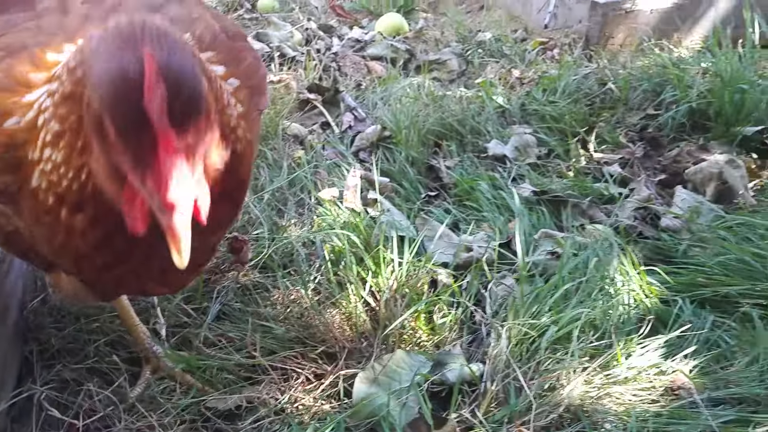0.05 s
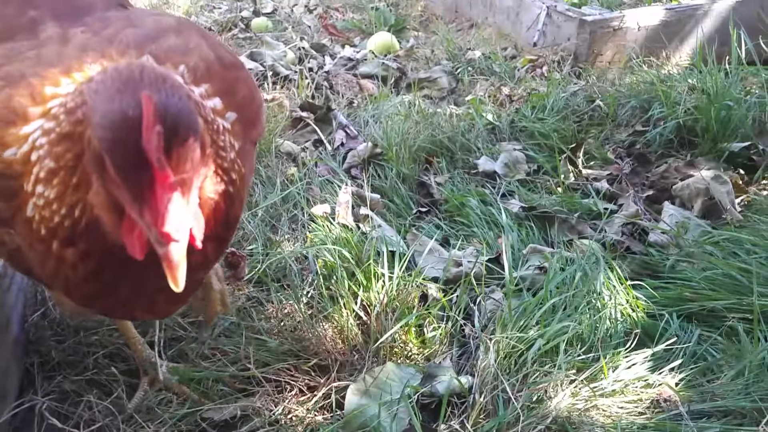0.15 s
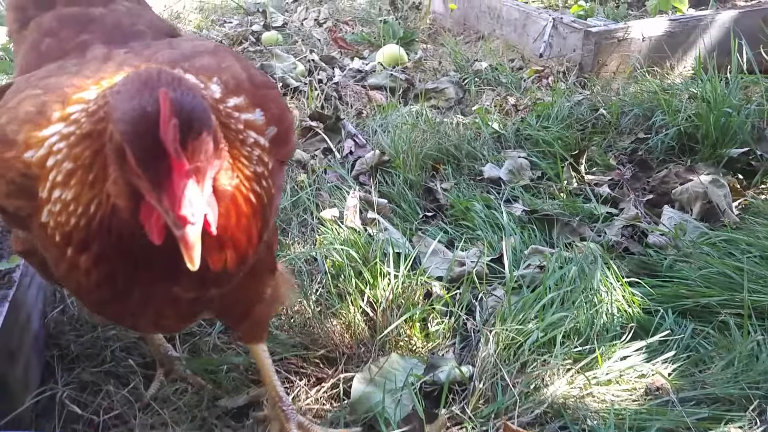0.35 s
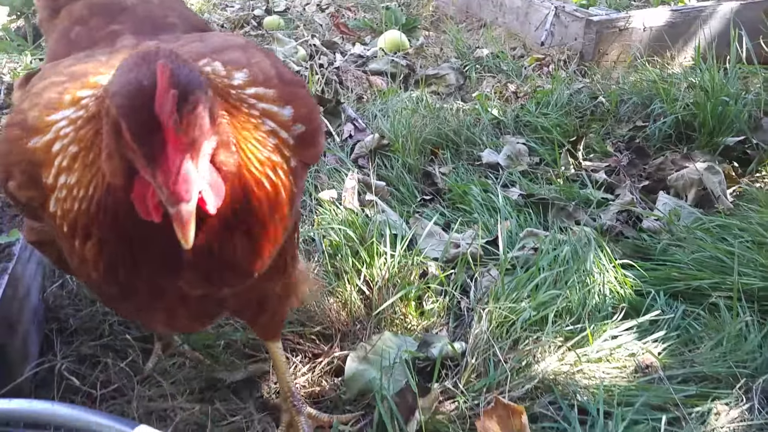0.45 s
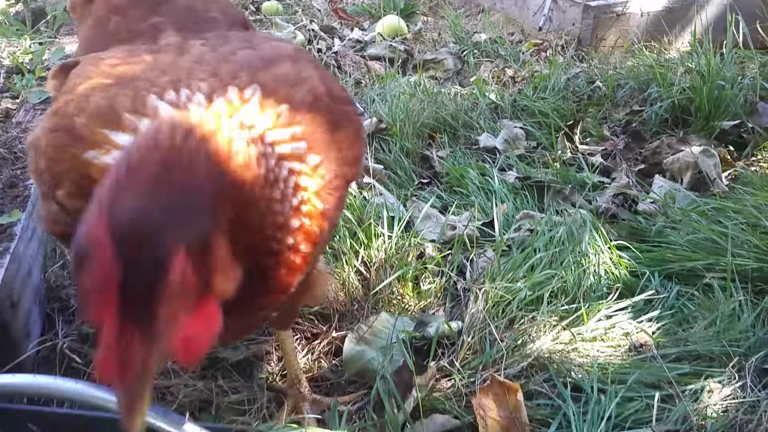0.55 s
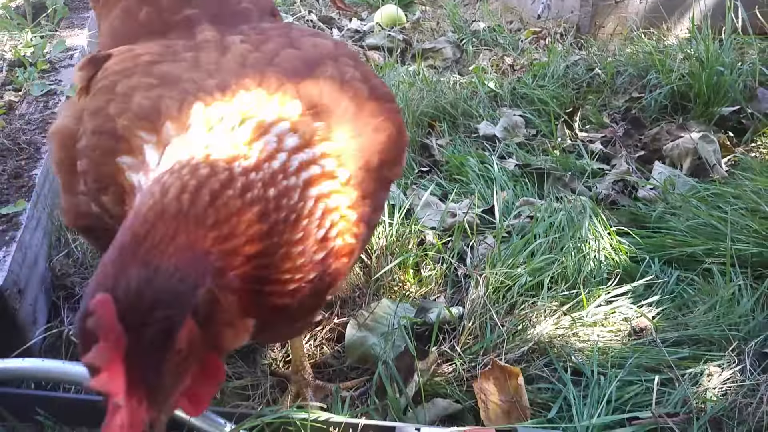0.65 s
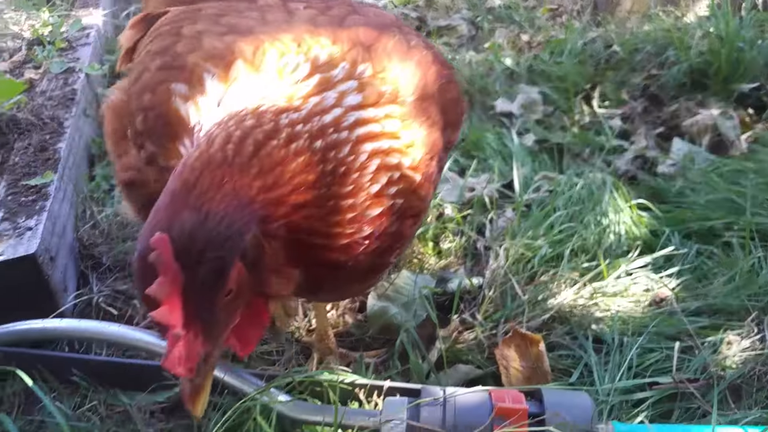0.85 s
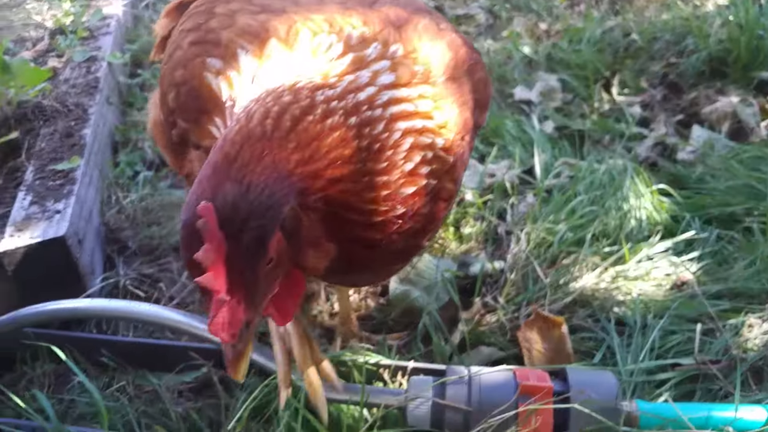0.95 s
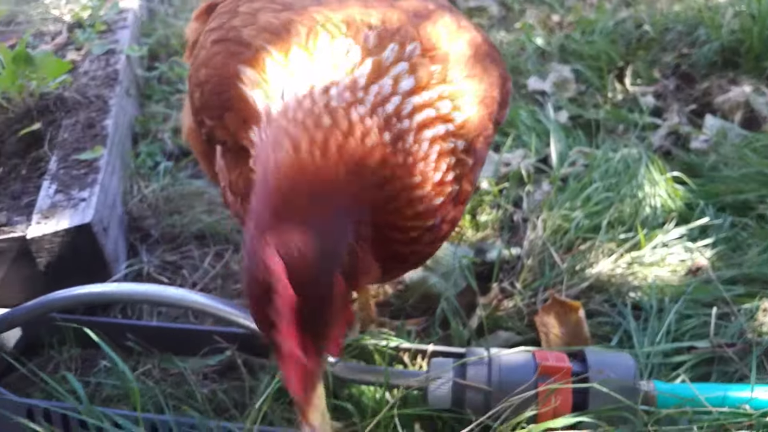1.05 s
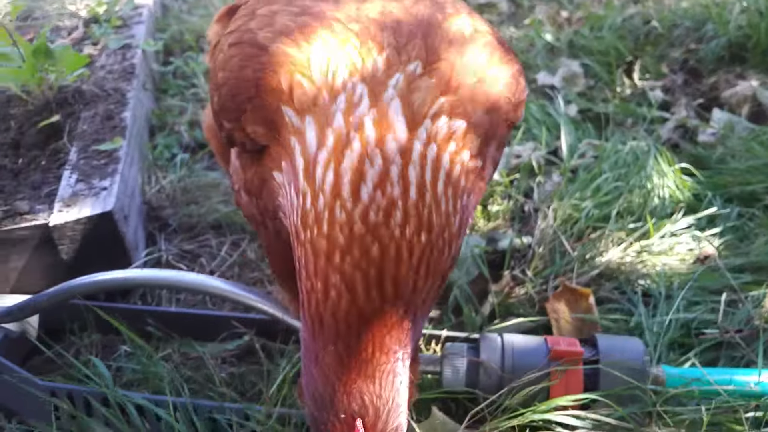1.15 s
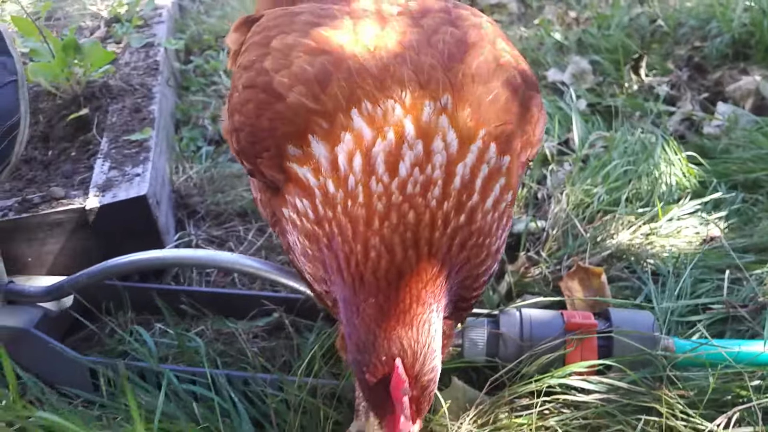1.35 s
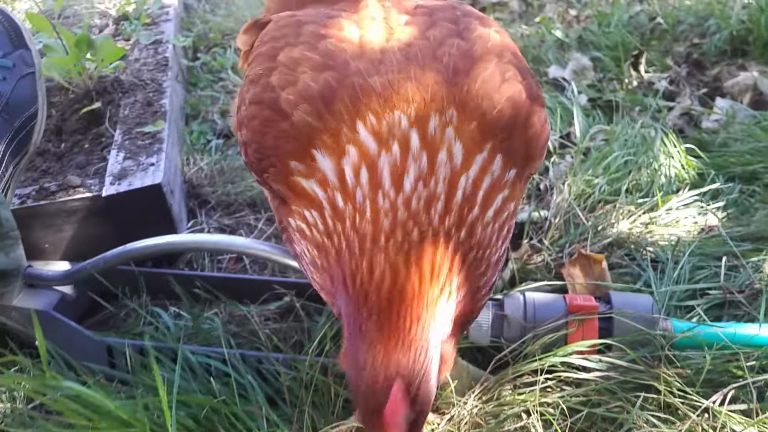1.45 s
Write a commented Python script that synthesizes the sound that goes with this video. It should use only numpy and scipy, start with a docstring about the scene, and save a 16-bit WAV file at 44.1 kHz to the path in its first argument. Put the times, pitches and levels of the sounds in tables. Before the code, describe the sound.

A hen gives three short, soft clucks close to the microphone as she walks through a garden. A twig snaps and dry leaves crackle among the clucks, then feathers brush the grass over a low outdoor rumble and faint hiss.

```python
"""A hen on a lawn

A hen walks up and gives three soft, falling clucks, harmonic tones shaped by her throat's resonances.
Dry leaves and a twig snap and crackle under her feet and beak; her feathers brush the grass as she bends.
Behind her is a low outdoor rumble. The right microphone port rings in the treble; the left is muffled."""
import sys
import numpy as np
from scipy import signal
from scipy.fft import rfft, irfft, next_fast_len
from scipy.io import wavfile
from scipy.ndimage import map_coordinates

SR = 44100
rng = np.random.default_rng(int(sys.argv[2]) if len(sys.argv) > 2 else 0)


def pcm_store(signal):
    """Save signal as 16-bit PCM."""
    levels = np.round(np.clip(np.atleast_2d(signal), -1, 1) * 32767)
    wavfile.write(sys.argv[1], SR, levels.astype(np.int16).T)


N = 66150
T = np.arange(N) / SR

# Responses of the two microphone ports. Each row: frequency in Hz, gain in dB.
LEFT_PORT_GAIN = [(50, -14.5), (500, -28), (900, -18), (1400, -17.5), (2500, -11), (3200, -8), (4100, -8.5),
                  (5500, -12), (7600, -11.5), (9500, -15), (13000, -11.5)]
RIGHT_PORT_GAIN = [(50, 3), (3000, 1), (4800, 3.5), (5500, 9), (6000, 13), (6500, 12.5), (7200, 7),
                   (8500, -0.5), (10000, -3.5), (15000, -8)]
# Spectra of outdoor air, scuffed soil, leaf litter, sliding feathers and a tearing leaf.
# Each row: frequency in Hz, gain in dB.
AIR_SPECTRUM = [(25, -33), (38, -26.5), (50, -7.5), (64, 3), (80, -0.5), (100, -6), (128, -5), (170, -10.5),
                (250, -16.5), (400, -22.5), (850, -21.5), (1300, -24.5), (2500, -28), (5000, -32),
                (9000, -35), (16000, -51)]
SOIL_SPECTRUM = [(60, -3), (240, -0.5), (400, -5.5), (700, -5), (1300, -9.5), (2500, -23.5), (6000, -37)]
LITTER_SPECTRUM = [(200, -23), (1200, -8), (2400, -5.5), (3800, -3.5), (6000, 1.5), (8000, 4),
                   (11000, -2.5), (16000, 0)]
FEATHER_SPECTRUM = [(200, 2.5), (1000, -1.5), (2500, 2), (4000, 0.5), (6300, 1), (9000, 5.5), (16000, -2.5)]
LEAF_SPECTRUM = [(200, -17), (700, -21.5), (1500, -15), (2500, -8), (3600, -4), (6500, 1.5), (9000, 4.5),
                 (12000, 1.5), (16000, -11)]
# Far tones. Each row: frequency in Hz, peak time in seconds, level in dB,
# seconds to fade by 6 dB (of either sign).
FAR_TONES = [(774.6, 0.789, -68.5, 0.555), (457.4, 0.03, -71.5, 1.23), (127, .7, -69, -5)]
# Steps on soft ground. Each row: peak time in seconds, level in dB, seconds to fall to 1/e.
FOOTFALLS = [(0.026, -61.5, 0.0328), (0.146, -61.5, 0.0514)]
# Pressure on the litter. Each row: peak time in seconds, level in dB, seconds to rise 20 dB,
# seconds to fall 20 dB.
LITTER_SWELLS = [(0.269, -57.5, 0.35, 0.392), (0.407, -45.5, 0.01, 0.01), (0.521, -48.5, 0.077, 0.151),
                 (0.565, -39.5, 0.061, 0.1438), (.81, -57, 0.0584, 0.163), (0.921, -62.5, 0.042, 0.0534)]
# Leaves and stalks breaking. Each row: start in seconds, level in dB, tear length in seconds,
# body in dB, resonance in Hz.
FRACTURES = [(0.456, -22.5, 0.00229, 11.5, 6238), (0.4992, -24, 0.00292, -5.5, 6433),
             (0.5045, -28.5, 0.00385, 2, 3850), (0.5412, -24, 0.00201, -1.5, 7156),
             (0.5646, -42.5, 0.00041, 7.5, 6300), (0.587, -38.5, 0.00061, -7.5, 7140),
             (0.609, -34, 0.00081, -4.5, 6120), (0.6263, -36, 0.00092, -1, 6260),
             (0.6566, -38.5, 0.00147, 6.5, 5530), (0.663, -39, 0.00138, 3.5, 5920),
             (0.6725, -40, 0.0021, -12.5, 6070), (0.69, -35, 0.00054, 0, 6280),
             (0.702, -30, 0.00027, 2.5, 5770), (0.72, -45, .0006, -2.5, 6970),
             (0.7272, -40, 0.00058, -0.5, 6780), (0.796, -48, 0.0028, -2.5, 7360),
             (0.823, -42, 0.00328, -2, 4925), (0.856, -46, 0.0009, 0.5, 5600),
             (0.9032, -32.5, 0.000906, 0.5, 5570), (0.9152, -43.5, 0.00045, 10.5, 5840),
             (0.9246, -47, 0.00082, 4.5, 5350), (1.105, -54.5, 0.00092, -1.5, 6100),
             (1.1282, -53.5, 0.00085, 8, 7020)]
# Colour that a thick stalk adds. Each row: frequency in Hz, multiplier of a fracture's body in dB.
BODY_WEIGHTS = [(200, 1.3774), (1500, 2.0264), (3000, 1.7838), (4500, -0.5), (6500, 1), (11000, 0.8746)]
# Modes of the twig. Each row: frequency in Hz, level in dB, seconds to decay by 60 dB.
TWIG_MODES = [(296, -52.5, 0.037), (902, -46.5, 0.071), (1544, -37, 0.0183), (2186, -51, 0.0116),
              (2820, -32, .013), (4113, -34, 0.0317), (4920, -31.5, 0.032)]
# Throat pulses ahead of a cluck. Each row: start in seconds, level of the first pulse in dB.
CREAK_ONSETS = [(0.3717, -12.5), (0.5502, -20)]
# Filters for the voice's pulses, harmonics and breath noise. Each row: frequency in Hz, gain in dB.
CREAK_SPECTRUM = [(80, -15), (230, 4.5), (450, -1), (700, 6.5), (1000, -1), (1300, 1.5), (1700, -49.5),
                  (4000, -45)]
THROAT_FORMANTS = [(450, -2), (600, 2.5), (900, 9.5), (1100, 8.5), (1200, -16), (1400, -3), (1600, -15.5),
                   (1850, -10), (2020, -13), (2200, -29.5), (3200, -30.5)]
RASP_SPECTRUM = [(1000, -19.5), (3000, -7.5), (4400, 2), (5600, -13.5), (9000, -18.5), (16000, -39.5)]
# The clucks. Each row: start, length and attack in seconds, first and resting pitch in Hz, glide time
# in seconds, source level in dB, offset of harmonic 2 in dB, offset of harmonics 3-5 and rasp in dB.
CLUCK_NOTES = [(.227, 0.05687, 0.0268, 590, 448.7, 0.01477, -38.5, -2, -1),
               (0.384, 0.05262, 0.0229, 570, 471.3, 0.01608, -38.5, -6, -7.5),
               (0.562, 0.0324, 0.0232, 545, 438.6, 0.02667, -37.5, -10, -5)]

FRACTURE_RISE_S = 0.000626


def amp(db):
    """Amplitude ratio of a level in decibels."""
    return 10 ** (np.asarray(db) / 20)


def unit_rms(x):
    """Normalisation to unit mean power."""
    return x / np.sqrt(np.mean(x ** 2) + 1e-20)


def ramp(u):
    """A raised-cosine step from 0 to 1."""
    return np.sin(np.pi / 2 * np.clip(u, 0, 1)) ** 2


def curve_at(points, hz):
    """Interpolation of (Hz, value) points on a logarithmic frequency axis."""
    freqs, values = np.transpose(points)
    return np.interp(np.log(hz + 1), np.log(freqs + 1), values)


def wobble(knots_per_s):
    """Smooth random modulation: a spline through Gaussian values."""
    return map_coordinates(rng.standard_normal(int(N * knots_per_s / SR) + 4), [T * knots_per_s])


def colour(x, points, scale=1, size=1024):
    """Minimum-phase filtering by (Hz, dB) points, their decibels multiplied by scale."""
    gain = amp(scale * curve_at(points, np.fft.rfftfreq(size, 1 / SR)))
    cepstrum = irfft(np.log(gain))
    cepstrum[1:size // 2] *= 2  # folding the cepstrum makes the filter causal
    cepstrum[size // 2 + 1:] = 0
    response = irfft(np.exp(rfft(cepstrum)))
    return signal.fftconvolve(np.atleast_2d(x), response[None], axes=1)[:, :x.shape[-1]]


def ports(x):
    """Each port filters the sound: the left attenuates it, the right resonates near 6 kHz."""
    x = np.atleast_2d(x)
    return np.vstack([colour(x[0], LEFT_PORT_GAIN), colour(x[-1], RIGHT_PORT_GAIN)])


def unit_at_ports(x):
    """Port filtering, normalised to unit power on the right."""
    y = ports(x)
    return y / np.std(y[1])


def noise_pair(angle=1, size=N):
    """Partial coherence: two white noises whose correlation is cos(angle)."""
    shared, independent = rng.standard_normal((2, size))
    return np.array([np.cos(angle) * shared + np.sin(angle) * independent, shared])


def grains(per_s, spread_db=6.5):
    """Shot noise: tiny fractures at random moments, with log-normal sizes."""
    sizes = amp(spread_db * np.clip(rng.standard_normal(N), -2, 2))
    occurs = rng.random(N) < per_s / SR
    return unit_rms(occurs * sizes * noise_pair())


def garden(waver_hz=2.154):
    """Ambient noise, strongest in the bass, with faint far tones wavering in frequency."""
    air = unit_at_ports(colour(noise_pair(angle=1.81), AIR_SPECTRUM, size=8192))
    tones = np.zeros(N)
    for hz, peak, db, fade in FAR_TONES:
        phase = 2 * np.pi * np.cumsum(hz + waver_hz * wobble(25.28)) / SR
        tones += amp(db) * 2 ** -(((T - peak) / fade) ** 2) * np.sin(phase)
    return amp(-56.5) * air + ports(tones)


def steps():
    """Soft contact: feet on soil give short, dull swells of noise."""
    weight = sum(amp(db) * np.exp(-((T - peak) / width) ** 2) for peak, db, width in FOOTFALLS)
    return weight * unit_at_ports(colour(noise_pair(), SOIL_SPECTRUM))


def rustle():
    """Crackling noise follows the pressure on the litter; stray grass blades tick throughout."""
    pressure = sum(amp(db - 20 * np.maximum((peak - T) / rise, (T - peak) / fall))
                   for peak, db, rise, fall in LITTER_SWELLS)
    crackle = unit_at_ports(colour(grains(per_s=2000) + amp(1) * noise_pair(), LITTER_SPECTRUM))
    ticks = unit_at_ports(colour(grains(per_s=160), LITTER_SPECTRUM))
    return pressure * crackle + amp(-72) * ticks


def feather_brush(peak_s=1.2792, width_s=0.0721):
    """Sliding friction of feathers on grass gives one soft swell of grainy noise."""
    swell = 1 / (1 + ((T - peak_s) / width_s) ** 4) ** 0.78
    friction = noise_pair() + amp(-1.5) * grains(per_s=1800)
    return amp(-51.5) * swell * unit_at_ports(colour(friction, FEATHER_SPECTRUM))


def snaps(size=2048, tear_t60_s=0.0046, ring_db=9.5, ring_edge_ratio=1.0722):
    """Brittle fracture: a brief tear and a shiver excite the leaf's resonance; thick stalks add body."""
    out, t = np.zeros((2, N + size)), T[:size]
    for start, db, length, body_db, ring_hz in FRACTURES:
        after = np.maximum(t - length, 0)
        shiver_t60_s = 8.26 * length
        shiver = amp(7 - 60 * after / shiver_t60_s)
        envelope = ramp(t / FRACTURE_RISE_S) * (amp(-60 * after / tear_t60_s) + shiver)
        tear = colour(envelope * noise_pair(size=size), LEAF_SPECTRUM)
        resonance = [(ring_hz / ring_edge_ratio, 0), (ring_hz, ring_db), (ring_hz * ring_edge_ratio, 0)]
        crack = ports(colour(colour(tear, BODY_WEIGHTS, scale=body_db), resonance))
        crack *= np.linalg.norm(envelope / envelope.max()) / np.linalg.norm(crack[1])
        first = round(start * SR)
        out[:, first:first + size] += amp(db) * crack
    return out[:, :N]


def twig(rattle_cycles=0.141):
    """The first fracture excites a twig's damped modes; rubbing of the split wood scatters their phase."""
    t = np.maximum(T - FRACTURES[0][0], 0)
    ring = np.zeros(N)
    for hz, db, t60 in TWIG_MODES:
        cycles = hz * t + rng.random() + rattle_cycles * wobble(700)
        ring += amp(db - 60 * t / t60) * np.sin(2 * np.pi * cycles)
    return ports(ramp(t / FRACTURE_RISE_S) * ring)


def creaks(first_gap_s=0.0042, gap_ratio=0.82, fade_db=3):
    """Pulse excitation: the throat opens with four quickening, weakening impulses."""
    pulses = np.zeros(N)
    for time, db in CREAK_ONSETS:
        for k in range(4):
            pulses[round(time * SR)] += amp(db - fade_db * k)
            time += first_gap_s * gap_ratio ** k
    return colour(pulses, CREAK_SPECTRUM)[0]


def clucks(release_s=0.01276, jitter=0.0076, overtone_growth=0.66):
    """Source and filter: falling harmonics pass the throat's formants; overtones grow with effort."""
    out = np.zeros(N)
    for start, length, attack, first_hz, rest_hz, glide, db, second_db, upper_db in CLUCK_NOTES:
        t = np.maximum(T - start, 0)
        hz = rest_hz + (first_hz - rest_hz) * np.exp(-(t / glide) ** 1.65)
        phase = 2 * np.pi * np.cumsum(hz * (1 + jitter * wobble(305.84))) / SR
        effort = np.sqrt(ramp(t / attack)) * ramp((length - t) / release_s)
        for k, offset_db in enumerate([0, second_db, upper_db, upper_db, upper_db], 1):
            level_db = db + curve_at(THROAT_FORMANTS, k * hz) + offset_db
            out += amp(level_db) * effort ** (1 + overtone_growth * (k - 1)) * np.sin(k * phase)
        rasp = unit_rms(colour(rng.standard_normal(N), RASP_SPECTRUM)[0])
        out += amp(upper_db - 68) * effort ** 2 * (1 + np.cos(phase)) * rasp  # one puff a cycle
    return out


def hen(echo_t60_s=0.207, echo_cutoff_hz=1800):
    """Direct sound and reverberation: her voice and its faint, dull return from the garden."""
    voice = clucks() + creaks()
    t = T[:SR // 4]
    lowpass = signal.butter(2, echo_cutoff_hz, fs=SR)
    tail = signal.lfilter(*lowpass, rng.standard_normal((2, len(t)))) * amp(-60 * t / echo_t60_s)
    tail *= np.sqrt(2 * echo_cutoff_hz / SR) / np.linalg.norm(tail[1])  # about unit passband gain
    echo = signal.fftconvolve(voice[None], tail, axes=1)[:, :N]
    return ports(voice + amp(-24) * echo)


def scene():
    """Superposition of the hen, the leaves and the garden at the two ports."""
    return hen() + steps() + snaps() + twig() + rustle() + feather_brush() + garden()


def record(dry, whine_hz=13500, band_limit_hz=16000):
    """Self-noise and band limiting: the electronics add hiss and a thin whine, then cut the top treble."""
    hiss = amp(-65.5) * rng.standard_normal((2, N))
    whine = amp(-76.5) * np.sin(2 * np.pi * whine_hz * T)
    size = next_fast_len(N + SR // 2)
    passband = np.fft.rfftfreq(size, 1 / SR) < band_limit_hz
    return irfft(rfft(dry + hiss + whine, size) * passband, size)[:, :N]


dry = scene()
out = record(dry)
pcm_store(out)
```